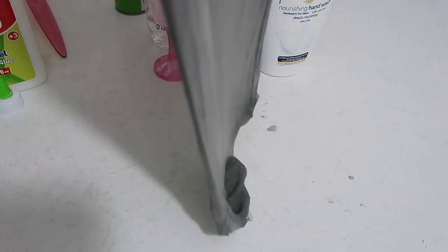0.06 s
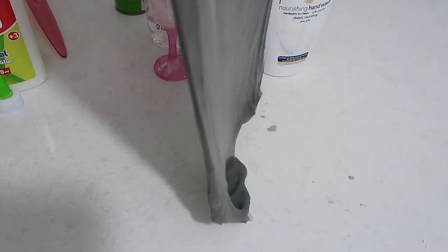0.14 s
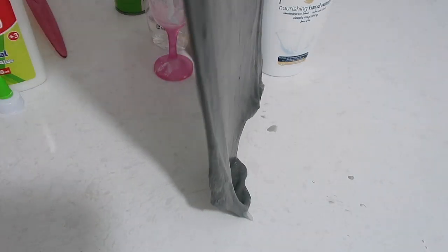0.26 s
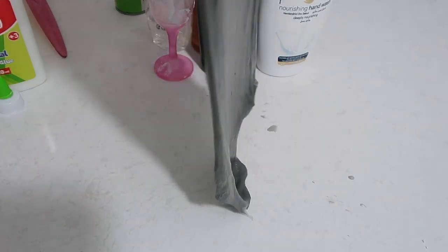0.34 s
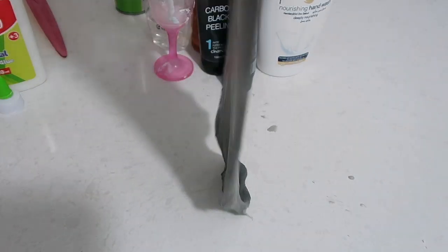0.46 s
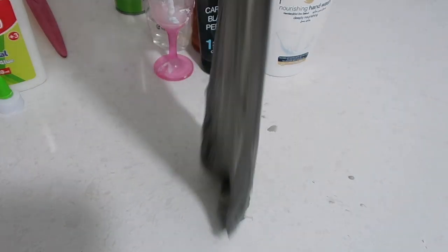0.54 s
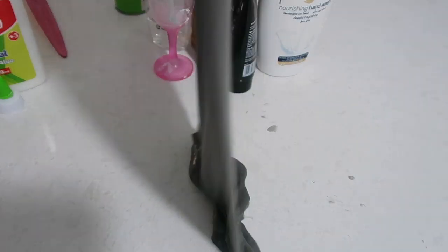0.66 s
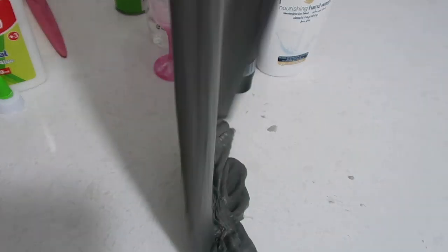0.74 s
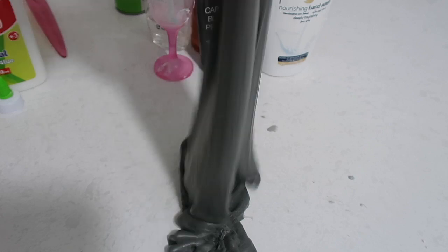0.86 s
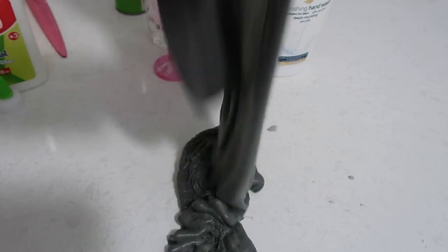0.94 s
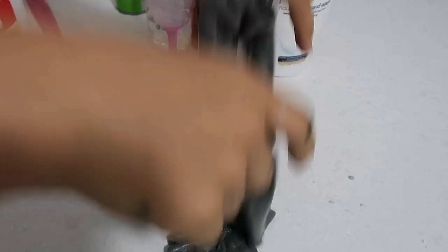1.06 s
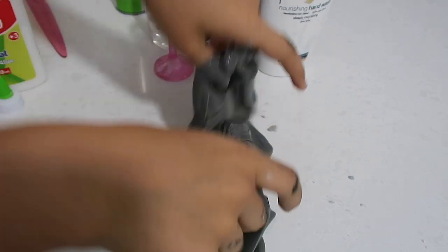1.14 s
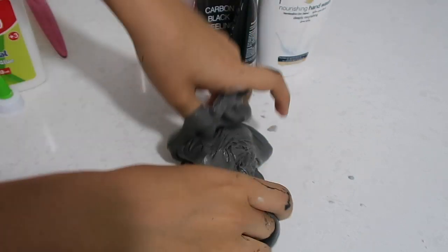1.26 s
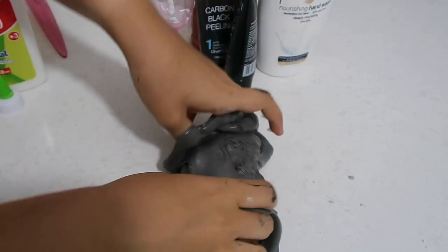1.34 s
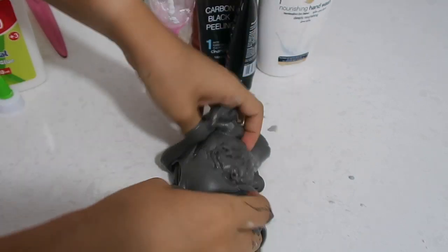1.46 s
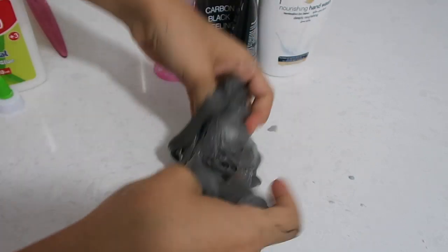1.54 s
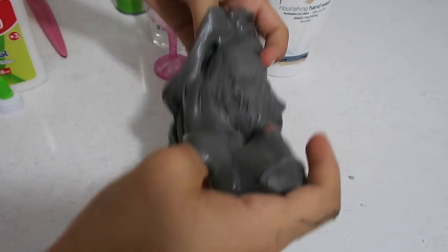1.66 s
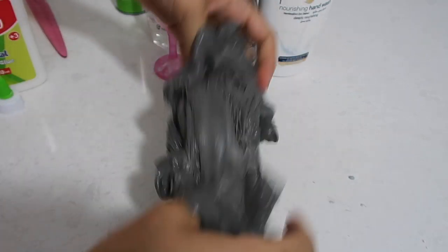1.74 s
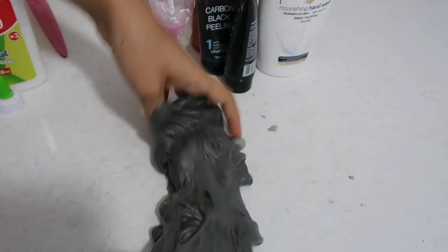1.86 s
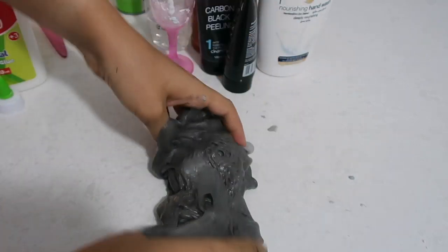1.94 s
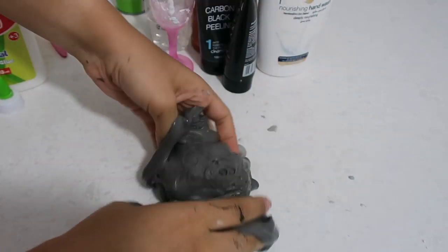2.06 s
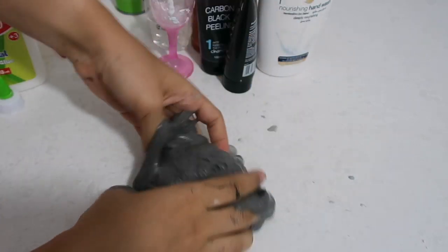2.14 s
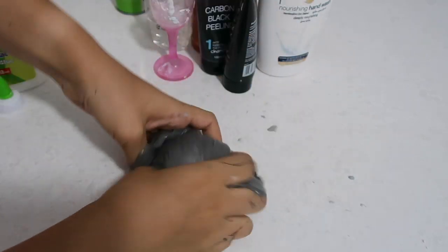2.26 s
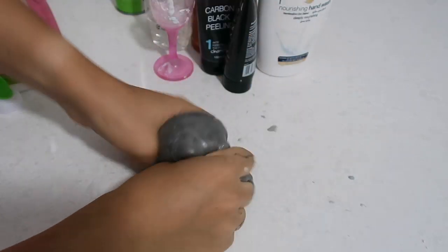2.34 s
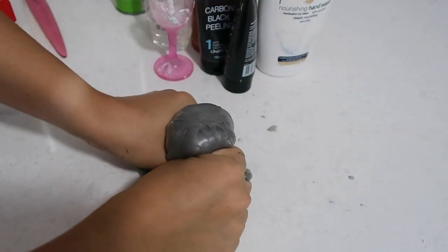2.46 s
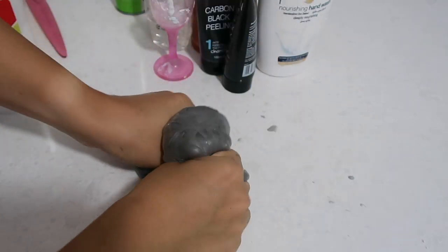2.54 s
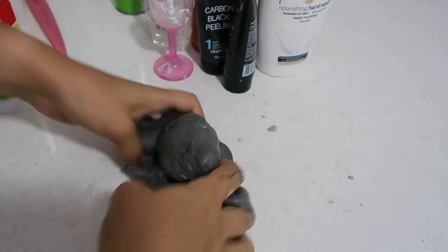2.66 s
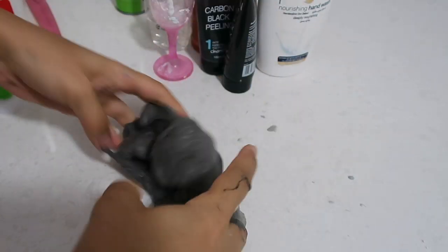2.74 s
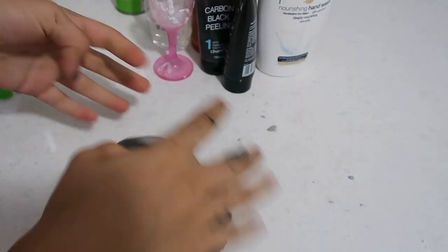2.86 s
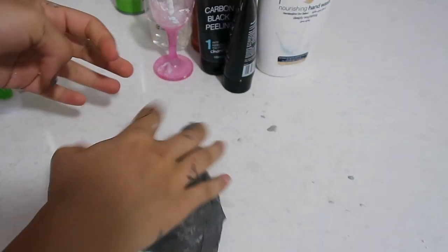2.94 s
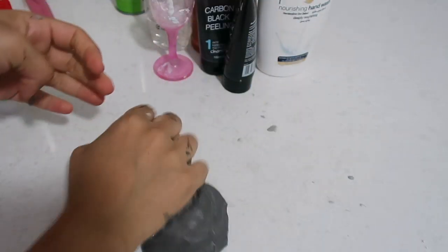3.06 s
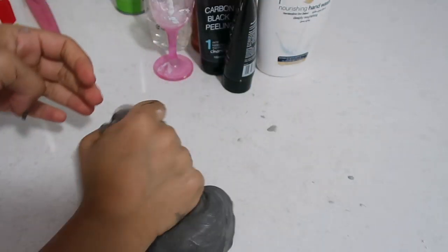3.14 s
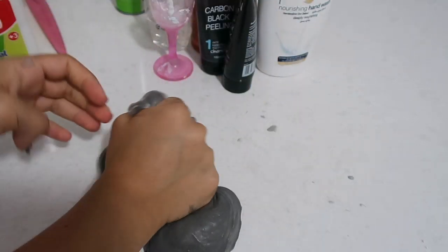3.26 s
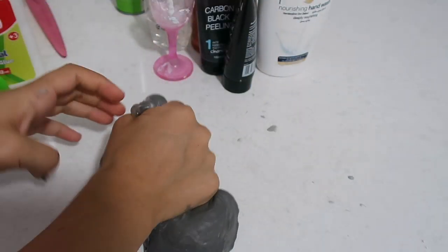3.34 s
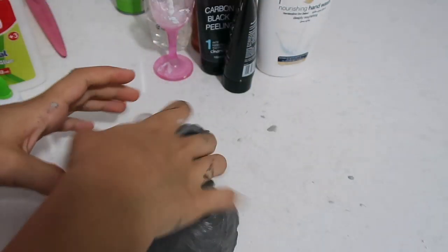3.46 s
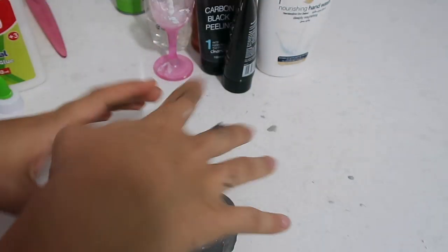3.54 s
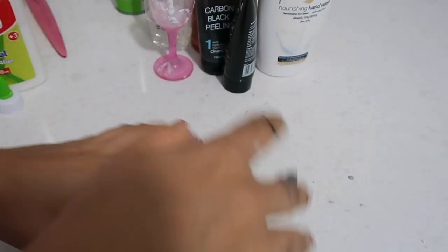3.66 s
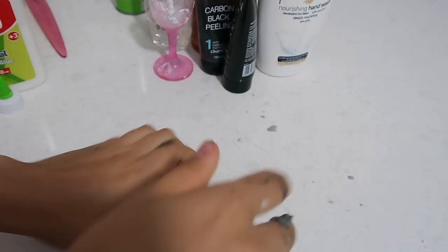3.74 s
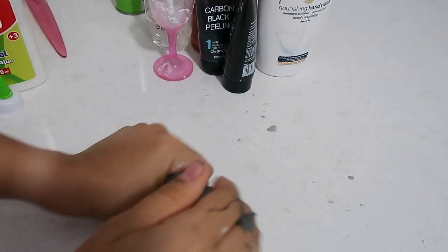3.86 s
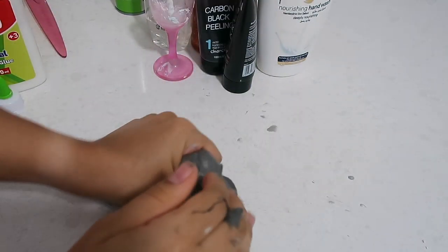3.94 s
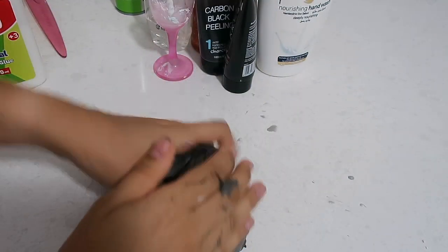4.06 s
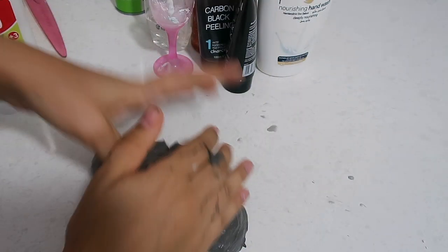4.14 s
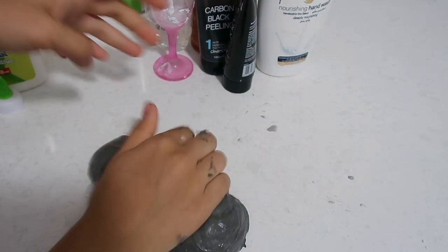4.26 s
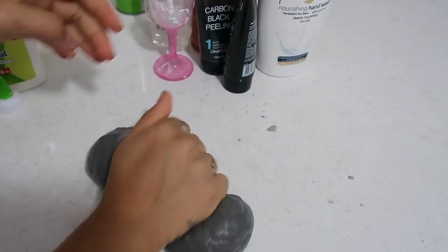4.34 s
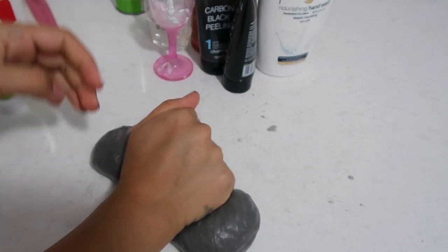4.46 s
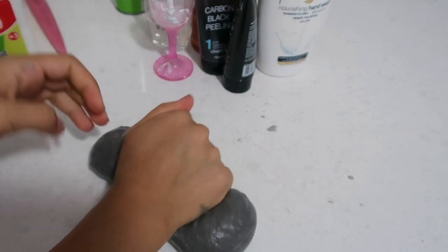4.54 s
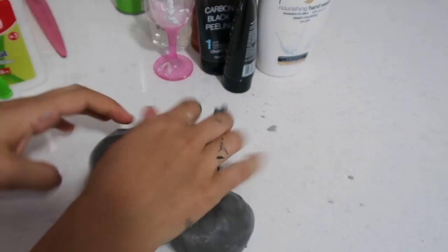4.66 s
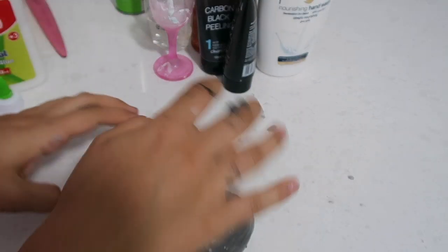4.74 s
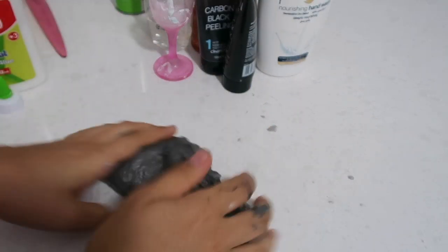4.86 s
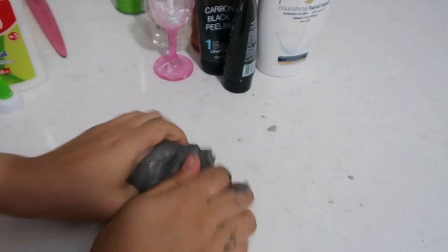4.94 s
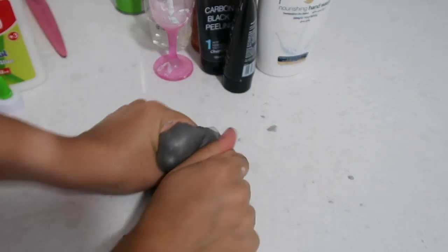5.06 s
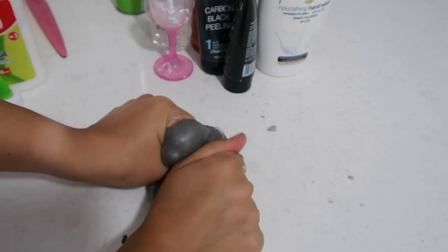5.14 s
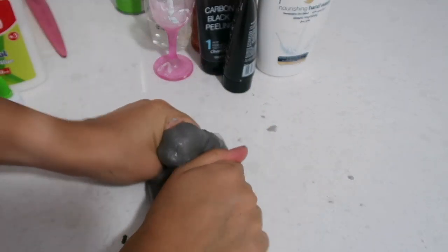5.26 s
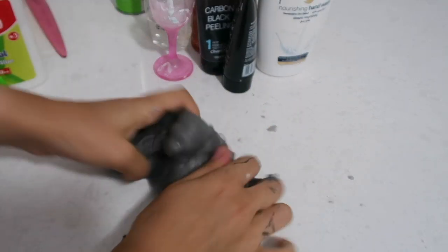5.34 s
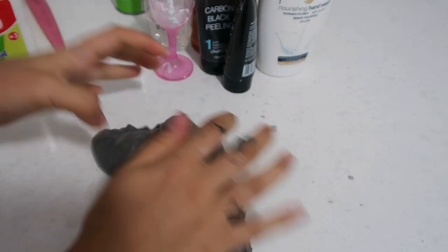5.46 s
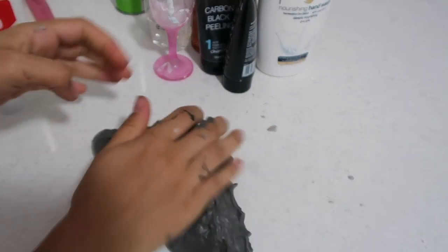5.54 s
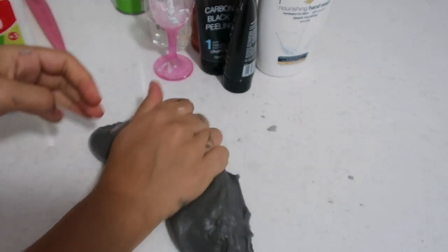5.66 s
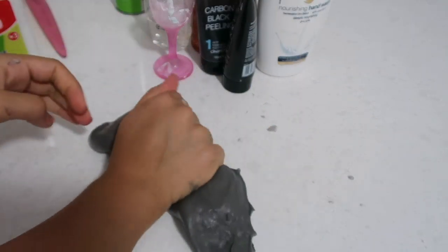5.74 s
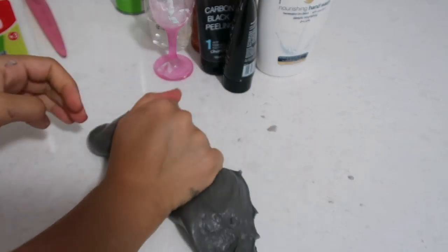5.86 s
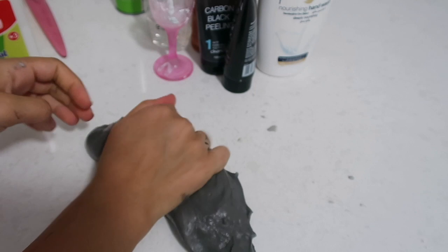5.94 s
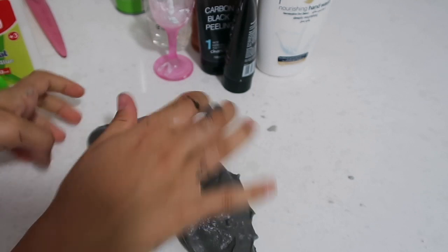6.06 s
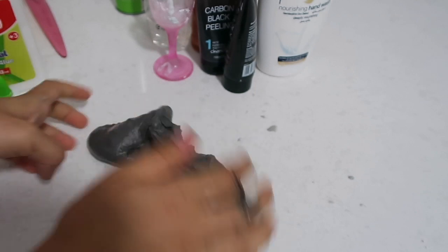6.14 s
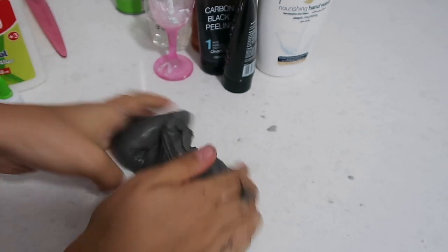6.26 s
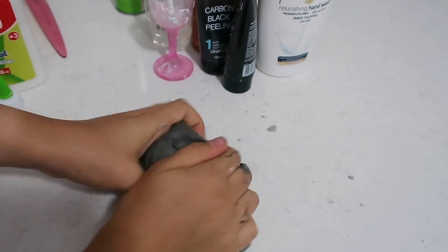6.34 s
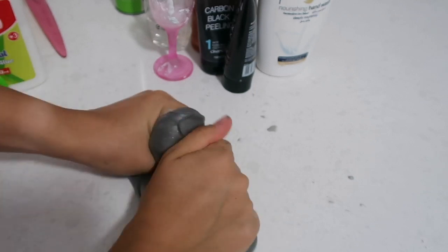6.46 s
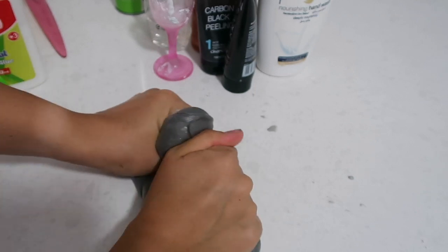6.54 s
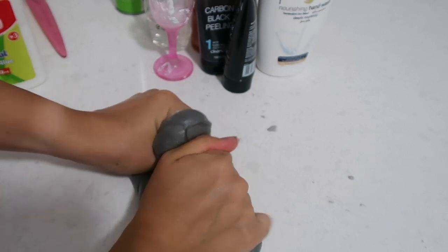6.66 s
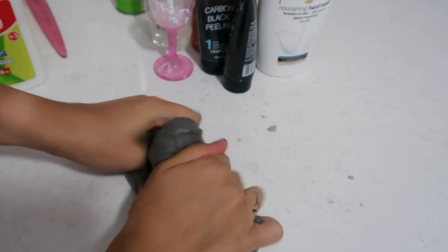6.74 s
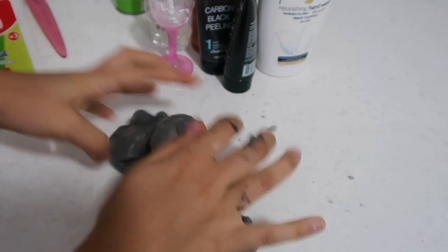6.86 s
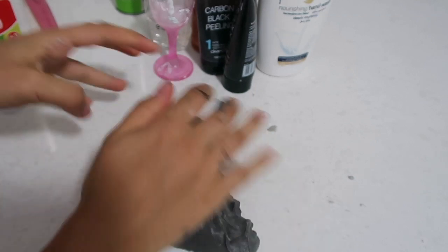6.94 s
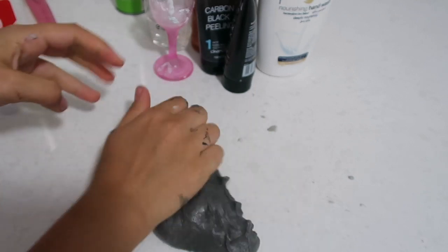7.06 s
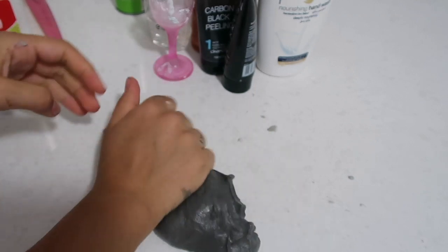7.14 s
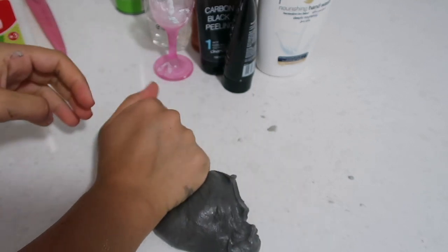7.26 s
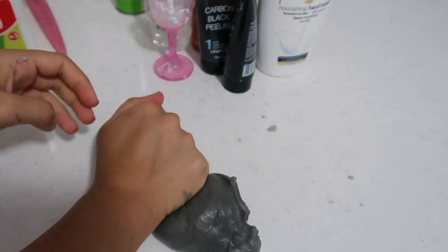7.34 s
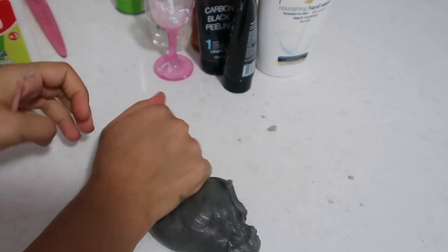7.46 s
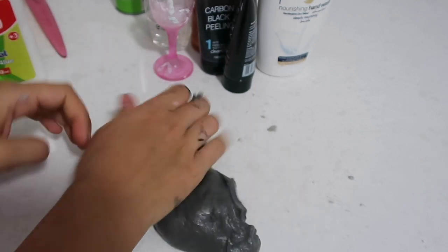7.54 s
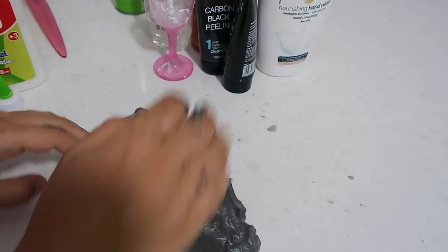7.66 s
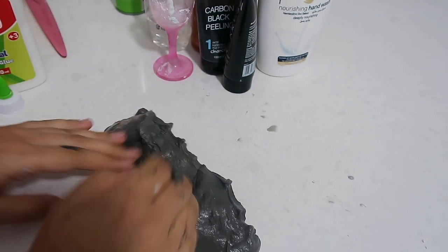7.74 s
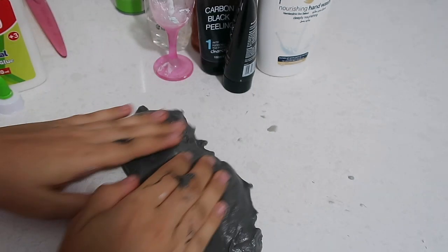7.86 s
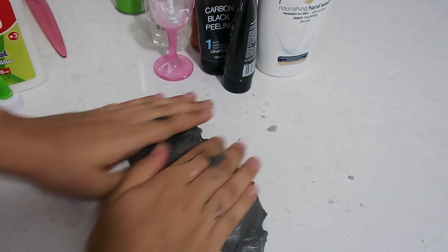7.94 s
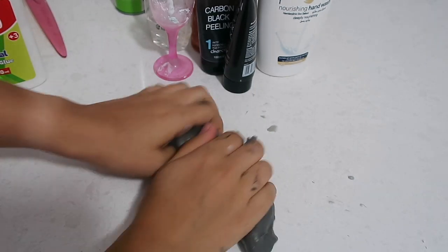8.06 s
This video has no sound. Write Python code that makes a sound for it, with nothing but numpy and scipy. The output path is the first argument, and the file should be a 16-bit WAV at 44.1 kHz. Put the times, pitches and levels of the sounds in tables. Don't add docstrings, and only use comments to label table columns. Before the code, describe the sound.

Hands knead soft slime on a hard table, with sharp wet pops, crackles and dull smacks over a low room hum and faint cricket.

```python
import sys
import numpy as np
from scipy import signal
from scipy.fft import rfft, irfft, next_fast_len
from scipy.io import wavfile
from scipy.ndimage import uniform_filter1d, map_coordinates

SR = 44100
rng = np.random.default_rng(int(sys.argv[2]) if len(sys.argv) > 2 else 0)


def wrap_up_sound(samples):
    columns = np.atleast_2d(samples).T
    tamed = np.clip(columns, -1, 1)
    steps = np.round(tamed * 32767).astype(np.int16)
    wavfile.write(sys.argv[1], SR, steps)


def ratio_of_db(decibels):
    return 10 ** (np.asarray(decibels, float) / 20)


N = 356769
LANES = 5


def unit(x):
    return x / np.sqrt(np.mean(x ** 2) + 1e-20)


def along(points, hz):
    f, v = np.transpose(points)
    return np.interp(np.log(hz + 1), np.log(f + 1), v)


def curve(rows):
    return np.interp(np.arange(N) / SR, *np.transpose(rows))


def holds(rows, rise, fall, floor_db):
    t = np.arange(0, N, 64) / SR
    s, held, db = np.transpose(rows)[:3, :, None]
    level = db - rise * np.clip(s - t, 0, None) - fall * np.clip(t - s - held, 0, None)
    return np.interp(np.arange(N) / SR, t, np.maximum(level.max(axis=0), floor_db))


def wobble(rate):
    knots = rng.standard_normal(int(N * rate / SR) + 4)
    return map_coordinates(knots, [np.arange(N) * rate / SR])


def filtered(x, response):
    m = next_fast_len(x.shape[-1] + 8192)
    return irfft(rfft(x, m) * response(np.fft.rfftfreq(m, 1 / SR)), m)[..., :x.shape[-1]]


def spread(pair, alike):
    turn = lambda hz: np.arccos(np.clip(along(alike, hz), -1, 1)) / 2
    mid, side = filtered(pair, lambda hz: np.array([np.cos(turn(hz)), np.sin(turn(hz))]))
    return np.array([mid + side, mid - side])


def ring(t, hz, t60, rise, glide=0., phase=0.):
    shape = ratio_of_db(-60 * t / t60) * (1 - np.exp(-t / rise))
    shape = shape / shape.max(axis=-1, keepdims=True)
    return shape * np.sin(2 * np.pi * hz * t * (1 + glide * t / t60) + phase)


def add(lanes, k, s, x):
    part = lanes[k % LANES, round(s * SR):][:len(x)]
    part += x[:len(part)]


# (time [s], level [dB])
HUM_LEVEL = [
    (0, -54.5),
    (2, -54),
    (4.5, -53),
    (5.7, -58.5),
    (6.5, -54.5),
    (7.3, -58.5),
    (8.09, -55),
]
# (frequency [Hz], density [dB per Hz])
HUM_SPECTRUM = [(18, -60.5), (30, -17.5), (59, -6), (102, -14.5), (200, -11.5), (400, -13), (700, -14),
                (1100, -22), (1500, -21.5), (4000, -26.5), (8000, -34.5), (15000, -44)]
# (frequency [Hz], width [Hz], lift [dB])
HUM_RESONANCES = [(155, 142, 9), (296.2, 15, 13), (446.4, 105, 9.5), (548, 39, 9.5), (982, 270, 8.5)]
# (frequency [Hz], left-right likeness [-1 to 1])
HUM_COHERENCE = [(60, .97), (130, .93), (290, .82), (640, .87), (1410, .5), (3100, .3), (6820, 0),
                 (15000, -.2)]


def hum():
    z = signal.stft(rng.standard_normal((2, N)), nperseg=1024)[2]
    patches = uniform_filter1d(rng.standard_normal(z.shape[1:]), 6, 0)
    patches = uniform_filter1d(patches, 6, 1)
    pair = signal.istft(z * ratio_of_db(2.0 * unit(patches)), nperseg=1024)[1][:, :N]
    lift = lambda f: sum(db / (1 + (2 * (f - c) / w) ** 2) for c, w, db in HUM_RESONANCES)
    pair = filtered(pair, lambda f: ratio_of_db(along(HUM_SPECTRUM, f) + lift(f)))
    return unit(spread(pair, HUM_COHERENCE)) * ratio_of_db(curve(HUM_LEVEL) + 9.0 + 0.23 * wobble(2.7))


# (time [s], length [s], level [dB], stroke separation [0-1])
CHIRPS = [(0, 0.4, -63, 0.74), (.52, 0.12, -67.5, 0.8), (.71, 0.066, -63.5, 0.85), (.8, 0.45, -63, 0.1),
          (2.22, .4, -63, 0.1), (2.85, 0.25, -61, 0.1), (3.2, 0.42, -59, 0.4), (3.7, 0.12, -58, .4),
          (4.2, 0.15, -65.5, 0.4), (4.8, 0.3, -68, .9), (6.1, 0.25, -66.5, 0.8), (6.4, .08, -57, .3),
          (6.95, .08, -65, .9), (7.7, 0.23, -59.5, 0), (8.03, .06, -66, .6)]


def cricket():
    t = np.arange(N) / SR
    middles = [s + held / 2 for s, held, *_ in CHIRPS]
    depth = np.clip(np.interp(t, middles, [row[3] for row in CHIRPS]), 0, 1)
    stroke_phase = 2 * np.pi * np.cumsum(51 + 10 * wobble(12)) / SR
    strokes = .65 * (1 + depth * np.sin(stroke_phase)) ** 2
    fuzz = unit(filtered(rng.standard_normal((2, N)), lambda f: 1 / (1 + (f / 165) ** 2)))
    low = np.sin(2 * np.pi * np.cumsum(4215 + 22 * wobble(11)) / SR)
    low = low * ratio_of_db(holds(CHIRPS, rise=395, fall=398, floor_db=-77))
    high = np.sin(2 * np.pi * 5150 * t) * ratio_of_db(-78 + 5 * wobble(13.6))
    high = high * np.exp(-((t - .45) / 0.37) ** 4) * strokes
    return strokes * (1.1 + 1.8 * fuzz) * (low + high)


SMACK_HZ = 1560


def slap_level(db, hz):
    return db + 4.5 - 13 * np.log2(hz / SMACK_HZ)


def pocket_pops(rows):
    lanes, t = np.zeros((LANES, N)), np.arange(SR // 40) / SR
    for k, (s, db, hz, slap_db, snap_db) in enumerate(rows):
        r = rng.standard_normal(2)
        cavity = ring(t, hz, 3.2 / hz, 0.75 / hz, glide=-0.2, phase=1.3)
        cavity = cavity * (1 - np.exp(-8 * hz * t))
        slap_hz = np.clip(0.35 * hz, 950, 1450) * np.exp(0.36 * r[0])
        slap = ring(t, slap_hz, 0.0061, 0.0051, glide=-0.6, phase=2.56)
        snap = ring(t, 9800 * np.exp(0.08 * r[1]), 0.0007, .00007, phase=2.2)
        pop = ratio_of_db(db + 2.5) * cavity + ratio_of_db(slap_db - 9.0) * slap + ratio_of_db(snap_db + 9.0) * snap
        add(lanes, k, s - .0001, pop)
    return lanes


# (time [s], cavity level [dB])
SQUEEZE_TICKS = [(0.7, -43), (0.794, -37.5), (0.8553, -44), (1.5466, -50), (1.9018, -25.5), (2.9514, -34),
                 (3.1986, -34), (3.876, -27.5), (4.1316, -42), (4.391, -36), (5.0572, -32), (5.063, -44),
                 (5.7065, -47), (5.714, -32.5), (5.743, -40), (6.068, -28), (6.075, -33), (6.488, -28),
                 (6.5686, -26), (6.8494, -22), (7.1978, -45), (7.2066, -35)]


def ticks():
    pitch = 2050 * np.exp(0.76 * rng.standard_normal(len(SQUEEZE_TICKS)))
    return [(s, db, hz, slap_level(db, hz), db - 21.5) for (s, db), hz in zip(SQUEEZE_TICKS, pitch)]


# (time [s], held [s], crackle level [dB])
GRIPS = [(.8, 0.21, -55.5), (1.65, 0.014, -53), (2.0, .02, -41), (2.5, 0.28, -45.5), (3.25, 0.088, -41.5),
         (3.53, 0.017, -40.5), (3.92, 0.06, -37), (4.16, 0.0099, -42), (4.5, 0.22, -41),
         (5.1, 0.064, -39.5), (5.45, 0.0056, -44), (5.8, 0.099, -46.5), (6.5, 0.016, -47),
         (6.9, 0.0076, -45), (7.28, 0.28, -43.5)]


def crackle(count=7000):
    s, u, v = rng.random((3, count))
    hz = np.clip(2300 * np.exp(0.5 * rng.standard_normal((count, 1))), 400, 5200)
    size, lane = 160, (v * LANES).astype(int)
    t = np.arange(size) / SR
    level_db = np.minimum(-4 * np.log(u), 8)
    grains = ratio_of_db(level_db)[:, None] * ring(t[None] + 0 * hz, hz, 6 / hz, .0001)
    where = (s * (N - size)).astype(int)[:, None] + np.arange(size) + N * lane[:, None]
    x = np.bincount(where.ravel(), grains.ravel(), LANES * N).reshape(LANES, N)
    grip_db = holds(GRIPS, rise=167.5, fall=133, floor_db=-84)
    return unit(x) * ratio_of_db(grip_db - 10.5 + 2.86 * np.clip(wobble(25), -2, 1.2))


# (time [s], level [dB],
# frequency [Hz])
PRESSES = [(.876, -31, 320), (1.9345, -6, 417), (2.0756, -24.5, 496), (2.3536, -25.5, 294),
           (2.3726, -26, 183), (2.7059, -26, 427), (2.7241, -15.5, 432), (3.2175, -18.5, 407),
           (3.3132, -11.5, 460), (3.3985, -32, 445), (3.5183, -12.5, 394), (1.9352, -6, 1000),
           (3.8937, -17.5, 284), (4.1359, -19, 400), (4.1631, -13.5, 464), (4.3726, -22.5, 433),
           (4.388, -23.5, 158), (4.447, -22, 303), (4.424, -22, 305), (4.484, -22.5, 332),
           (2.4485, -24.5, 325), (4.5409, -26.5, 315), (4.5903, -18, 427), (4.7136, -21, 423),
           (5.1885, -11.5, 564), (5.213, -23, 633), (6.8551, -22.5, 378), (3.952, -21, 316),
           (7.199, -26, 410), (5.4034, -24, 410), (5.8248, -13.5, 420), (7.2207, -20.5, 450),
           (7.2633, -24, 253), (7.3082, -23, 262), (7.5921, -20.5, 292), (7.714, -29, 323)]


def thuds(rows):
    lanes, t = np.zeros((LANES, N)), np.arange(SR // 8) / SR
    pitch = 353 * np.exp(0.22 * rng.standard_normal(len(rows)))
    knocks = [(row[0], row[3] - 14.5, hz) for row, hz in zip(rows, pitch)]
    for k, (s, db, hz) in enumerate(PRESSES + knocks):
        r = rng.standard_normal(3)
        press = ring(t, hz, min(6.5 / hz, .017), min(.55 / hz, .0016), glide=-.1)
        table = 0.005 * ring(t, 209.7, 0.57, 0.0038, phase=r[0])
        table += 0.083 * ring(t, 277.6, 0.037, 0.011, phase=r[1])
        table += 0.16 * ring(t, 531.8, 0.11, 0.00077, phase=r[2])
        add(lanes, k, s, -ratio_of_db(db - 0.5) * (press + table))
    return lanes


# (time [s], level [dB], length [ms])
GUSTS = [
    (1.158, -38, 11),
    (1.186, -24.5, 8.8),
    (1.245, -31.5, 5.6),
    (1.297, -32, 12),
]


def puffs():
    t, x = np.arange(N) / SR, np.zeros(N)
    for s, db, ms in GUSTS:
        u = (t - s) * 1000 / ms
        x -= ratio_of_db(db) * np.cos(3.33 * u + rng.normal(0, 0.96)) * np.exp(-u ** 2 / 1.5)
    return x * ratio_of_db([[-1.5], [1.5]])


# (time [s], cavity level [dB], skin slap level [dB])
SKIN_SMACKS = [(1.595, -61, -31), (1.6183, -44, -32), (1.906, -31.5, -26), (2.7352, -32, -13),
               (2.7626, -26, -13.5), (2.9419, -34, -29), (3.075, -36, -37), (3.1707, -34, -17),
               (3.227, -18.5, -15), (3.2843, -35, -16.5), (3.519, -28, -10.5), (4.147, -32.5, -42),
               (4.1727, -41, -15.5), (4.3757, -52, -23), (4.383, -43, -25), (4.3956, -51, -13),
               (4.4042, -50.5, -13.5), (4.5307, -22, -28), (4.5786, -37.5, -11), (5.073, -30, -30),
               (5.0769, -27, -16.5), (5.1283, -16, -8), (5.1407, -20, -21), (5.4175, -27, -15),
               (5.422, -41, -27), (5.426, -31, -28), (5.761, -27, -23), (5.8195, -29, -30),
               (6.115, -30, -23), (6.5927, -21, -14.5), (6.8551, -22, -10.5), (7.5958, -29.5, -45)]


def smacks():
    return [(s, db, SMACK_HZ, slap_db, db - 27) for s, db, slap_db in SKIN_SMACKS]


# (time [s], cavity level [dB], cavity frequency [Hz], slap level [dB],
# snap level [dB])
MAIN_POCKETS = [(1.9336, -9, 2410, -19, -23), (1.9352, -5, 3130, -9, -38), (1.9368, -3.5, 5050, -31, -33),
                (2.4887, -25, 2180, -10, -32), (2.494, 4.5, 4750, -17.5, -7),
                (3.3139, -9, 2700, -4.5, -31), (3.8944, -12.5, 1630, -31, -46),
                (3.9097, -5.5, 3300, -9, -44), (4.5887, -7, 3430, -33, -27.5),
                (4.5912, -3, 7850, -10.5, -9.5), (5.1365, -13, 3700, -15.5, -21),
                (5.1785, -9, 2500, -6.5, -19), (5.189, -6.5, 4200, -13.5, -16.5),
                (5.1897, -13, 3800, -19, -9.5), (5.1931, 2, 4820, -27, -10.5),
                (5.2314, -5.5, 4700, -35.5, -16.5), (5.2486, -0.5, 5800, -15.5, -11),
                (5.8254, -5, 2840, -7, -21), (5.8254, -4, 4970, -51, -38), (5.856, -13, 5700, -22, -13.5),
                (6.6081, -15, 6300, -22, -16.5), (6.6088, 1.5, 6500, -14.5, -11),
                (6.6201, 5.5, 5700, -16.5, -17), (6.717, -5, 5800, -17.5, -10),
                (7.2355, -5.5, 4540, -16.5, -59), (7.3543, -3, 6900, -22, -8),
                (7.4081, -0.5, 3025, -28, -18), (7.4082, -7.5, 2070, -8, -33)]


def bursts():
    return list(MAIN_POCKETS)


# (time [s], level [dB], frequency [Hz], ringing [cycles])
SMALL_RINGS = [(2.7287, -23, 2910, 3.9), (2.736, -22.5, 3800, 6), (2.745, -31, 2500, 6.5),
               (2.79, -35, 3200, 8), (2.82, -36, 2600, 8), (3.076, -33, 4970, 3.9), (3.171, -33, 4000, 5),
               (3.2038, -39, 4100, 5.5), (3.235, -29, 2620, 6.7), (3.262, -28, 3000, 8),
               (3.33, -24, 3300, 7.2), (4.366, -43, 4400, 20), (4.387, -31.5, 3000, 4.6),
               (4.4495, -29, 2350, 8.5), (4.456, -40, 2530, 9.8), (4.466, -38, 2370, 40),
               (4.476, -41, 2400, 40), (4.485, -30.5, 3200, 5), (4.531, -23.5, 2800, 8),
               (4.539, -32, 2550, 10), (4.567, -22.5, 2410, 8), (5.044, -41, 4200, 14),
               (5.058, -32, 1850, 8.7), (5.0705, -26, 3000, 4.5), (5.077, -26, 3220, 8),
               (5.087, -34, 2170, 7), (5.095, -33, 4000, 10), (5.104, -30, 3600, 10),
               (5.1145, -19, 3520, 15), (5.122, -29, 4200, 10), (5.1368, -13, 3100, 11),
               (5.1425, -22, 2830, 3.8), (5.152, -17, 3620, 10), (5.856, -15.5, 5300, 6.7),
               (6.529, -36, 1300, 4.9), (6.569, -34, 1400, 4.3), (6.717, -19, 3370, 2.4),
               (6.6285, -8, 5200, 10), (1.9355, -14, 4630, 16), (3.915, -20, 2600, 5.7),
               (3.925, -20, 3220, 10), (5.845, -26, 2190, 7), (7.31, -40, 2000, 3.7), (7.3545, -6, 8300, 8),
               (7.3545, -30, 3620, 13), (7.4084, -11.5, 2520, 5.3), (7.4092, -12, 3300, 5.8),
               (7.4083, -9.5, 1700, 4.2), (2.02, -25, 2800, 9.3), (2.06, -30, 3400, 8), (2.1, -35, 2500, 8),
               (3.345, -29, 2500, 8), (3.37, -34, 3300, 8)]


def small_rings():
    lanes, t = np.zeros((LANES, N)), np.arange(SR // 30) / SR
    for k, (s, db, hz, cycles) in enumerate(SMALL_RINGS):
        add(lanes, k, s, ratio_of_db(db) * ring(t, hz, cycles / hz, 0.39 / hz, glide=-0.2))
    return lanes


# (time [s], cavity level [dB], cavity frequency [Hz], snap level
# [dB])
FURTHER_POCKETS = [(2.343, -22.5, 2360, -66), (2.3604, -27.5, 1600, -46), (2.383, -23, 2640, -54),
                   (2.4477, -15, 3640, -70), (2.4817, -12, 2800, -21.5), (2.5809, -13, 3720, -27.5),
                   (3.2056, -21, 5700, -47), (3.2189, -18, 4370, -44), (3.244, -22, 1890, -25.5),
                   (3.25, -22, 5380, -44), (3.3211, -21.5, 2860, -24), (3.521, -18, 3200, -35),
                   (3.952, -24, 8800, -26.5), (3.883, -27, 3000, -41), (3.937, -13.5, 2080, -46),
                   (4.446, -24, 2460, -49), (4.5048, -14, 6300, -22.5), (5.0864, -18.5, 3750, -56.5),
                   (5.113, -23.5, 3120, -34), (5.1733, -6.5, 6160, -34), (5.169, -27, 8450, -24.5),
                   (5.183, -26, 8800, -26), (4.1707, -27, 2980, -43), (4.451, -31, 2400, -48.5),
                   (5.2124, -18, 3460, -24), (5.76, -22, 4960, -33), (5.9936, -22.5, 4100, -35),
                   (6.4622, -27.5, 3400, -36), (6.492, -17.5, 6160, -47), (6.547, -16.5, 3300, -22.5),
                   (6.603, -19, 3030, -22), (6.6167, -13, 5560, -28), (4.5768, -21.5, 7500, -28),
                   (3.959, -37, 8800, -50), (2.561, -30, 8450, -40), (3.253, -19, 5630, -42),
                   (5.0605, -27, 6000, -52), (7.221, -10.5, 4000, -44), (7.226, -28.5, 4030, -40),
                   (7.2289, -13.5, 3930, -26)]


def further_pops():
    return [(s, db, hz, slap_level(db, hz), snap_db) for s, db, hz, snap_db in FURTHER_POCKETS]


# (delay [ms], level [dB])
CLOSE_ECHOES = [
    (.8, -3.5),
    (1.25, -12),
    (1.7, -15),
    (2.4, -17),
]


def near(lanes, lag):
    side, f = np.array([[1], [-1]]), np.fft.rfftfreq(1024, 1 / SR)
    lead, out = 256, 0
    for lane, r in zip(lanes, rng.standard_normal((LANES, 3, len(CLOSE_ECHOES) + 1))):
        heard = 0
        for (ms, db), a, b, c in zip([(0.0031, 0.0047)] + CLOSE_ECHOES, *r):
            delay = ms * np.exp(.08 * b) / 1000 + (lead - side * (lag + .5 * c) / 2) / SR
            heard = heard + ratio_of_db(db + 1.5 * a) * np.exp(-2j * np.pi * f * delay)
        response = irfft(heard * ratio_of_db(side * 1.0 * f / (f + 600)))
        out = out + signal.oaconvolve(lane[None], response, axes=1)[:, lead:lead + N]
    return out


# (frequency [Hz], t60 [s])
ROOM_T60 = [(150, 0.43), (400, 0.21), (1000, 0.49), (2800, 0.48), (7000, 0.51), (14000, 0.27)]
# (frequency [Hz], level [dB])
ROOM_SPECTRUM = [(100, 2.5), (300, 0.5), (600, -1), (1200, -1.5), (4000, -1.5), (8000, 0), (14000, -0.5)]
# (delay [ms], level [dB])
WALL_ECHOES = [
    (7.3, -10),
    (9.1, -11.5),
    (13.6, -28),
    (19.5, -20.5),
    (27., -31),
]
# (frequency [Hz], left-right likeness [-1 to 1])
TAIL_COHERENCE = [(60, .98), (290, .98), (640, .97), (1410, .92), (3100, .72), (6820, .05), (10000, -.2),
                  (15000, -.3)]


def room(lanes):
    hz, t, z = signal.stft(rng.standard_normal((2 * LANES, SR)), SR, nperseg=256)
    patches = uniform_filter1d(rng.standard_normal(z.shape), size=4, axis=1)
    patches = uniform_filter1d(patches, size=5, axis=2)
    z = z * ratio_of_db(2.5 * unit(patches))
    decay_db = along(ROOM_SPECTRUM, hz)[:, None] - 60 * t / along(ROOM_T60, hz)[:, None]
    tail = signal.istft(z * ratio_of_db(decay_db), SR, nperseg=256)[1][:, :SR]
    late = np.clip(np.arange(SR) / SR - .0068, 0, 1)
    scatter = ratio_of_db(-2.5) * (np.arange(SR) > 80)
    onset = np.maximum(1 - np.exp(-late / .002), scatter)
    tail = ratio_of_db(-1.5) * tail * onset / np.linalg.norm(tail[0])
    blur = np.array([.25, .5, .25])
    for ms, db in WALL_ECHOES:
        echo = blur * ratio_of_db(db + 1.5 * rng.standard_normal((LANES, 1)))
        tail[::2, round(ms * SR / 1000):][:, :3] += echo
    wet = signal.fftconvolve(np.repeat(lanes, 2, axis=0), tail, axes=1)[:, :N]
    return spread(wet.reshape(LANES, 2, N).sum(axis=0), TAIL_COHERENCE)


def scene():
    rows = sorted(ticks() + smacks() + bursts() + further_pops())
    hands = crackle() + thuds(rows) + pocket_pops(rows) + small_rings()
    hands = filtered(hands, lambda f: (1j * f / (125 + 1j * f)) ** 3)
    kneading = near(hands, lag=1.25) + room(hands) * ratio_of_db([[.5], [-.5]])
    return hum() + cricket() + puffs() + kneading


def low_pass(x):
    return signal.sosfilt(signal.butter(12, 16440, fs=SR, output="sos"), x)


def record(dry):
    port_hz = 12400
    x = filtered(dry, lambda f: 1 / (1 - (f / port_hz) ** 2 + 1.3j * f / port_hz))
    x = x / (1 + np.abs(x / .95) ** 8) ** (1 / 8)
    return low_pass(x)


dry = scene()
out = record(dry)
wrap_up_sound(out)
```